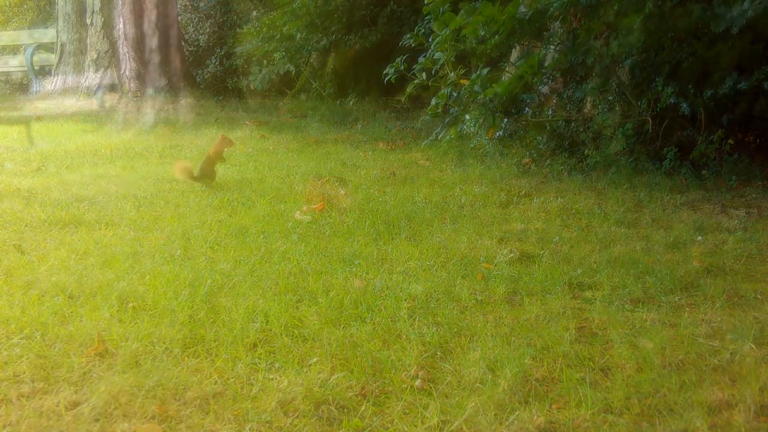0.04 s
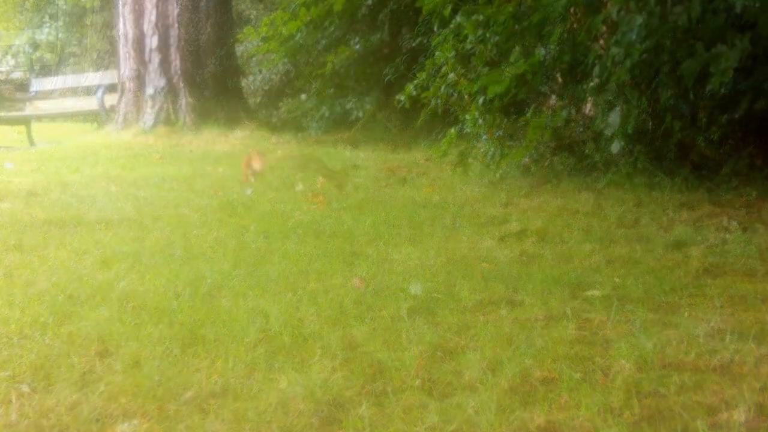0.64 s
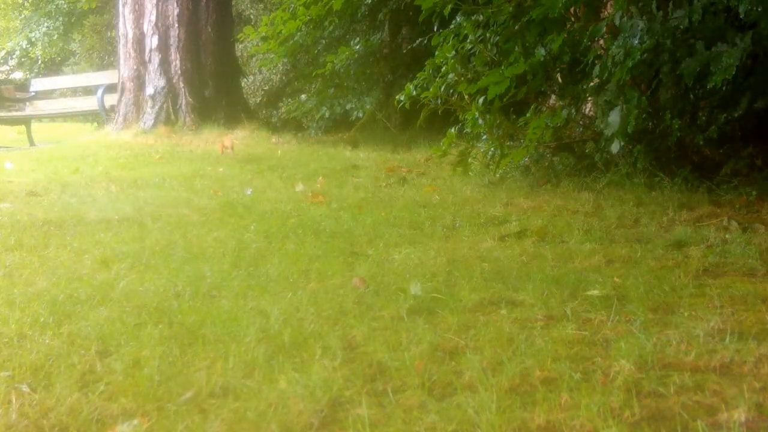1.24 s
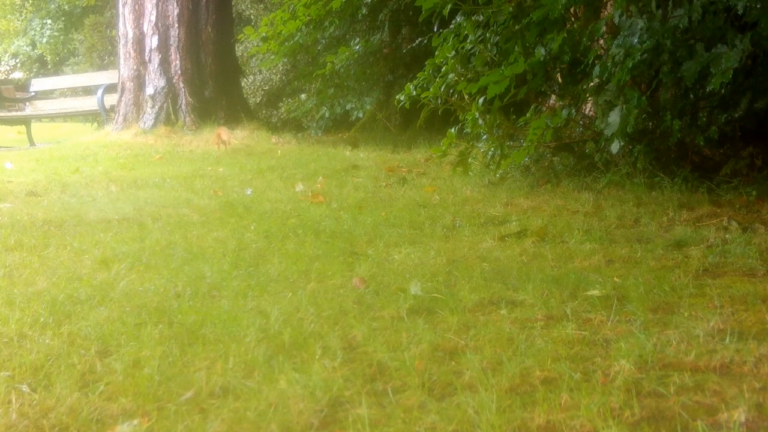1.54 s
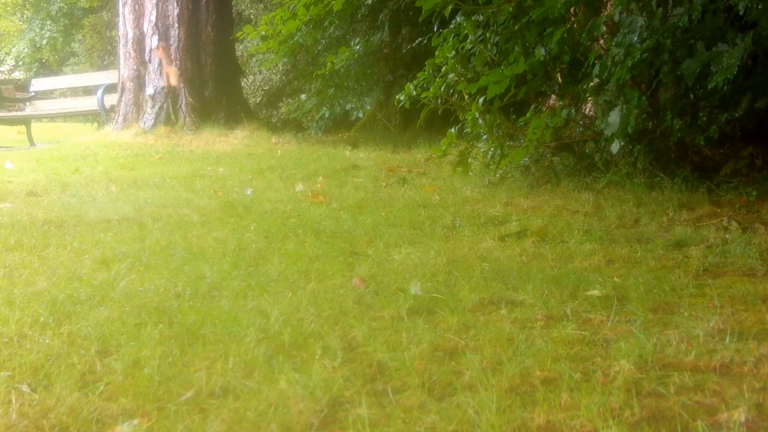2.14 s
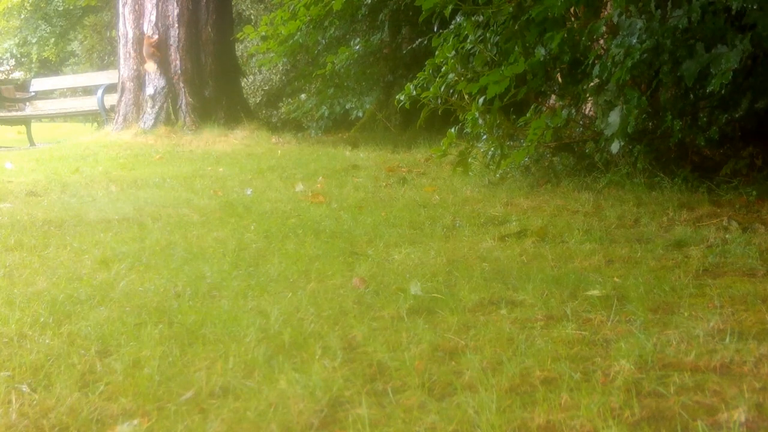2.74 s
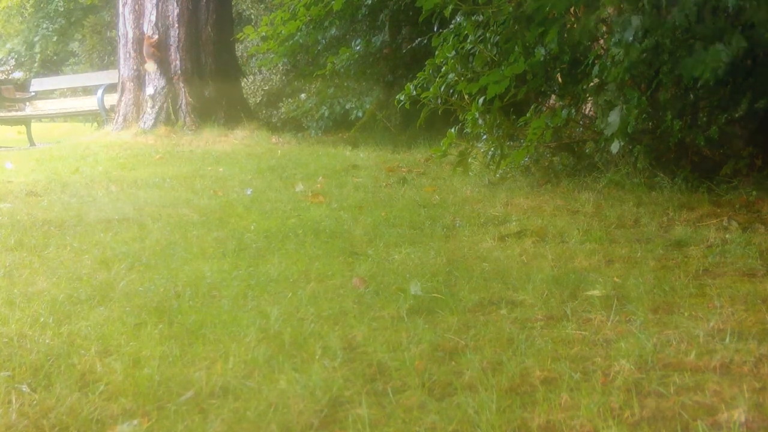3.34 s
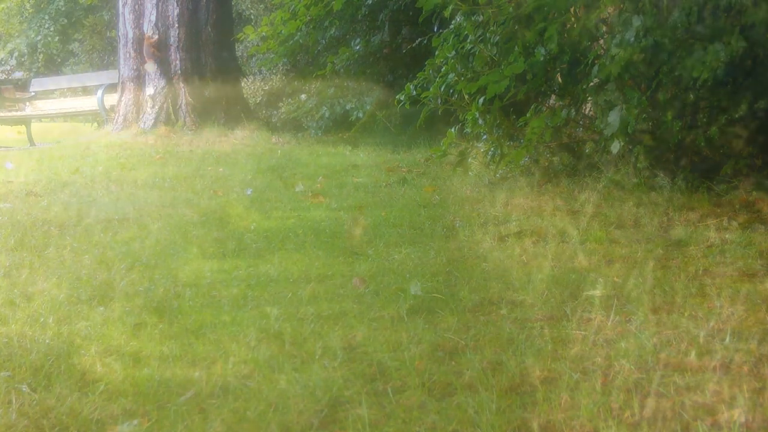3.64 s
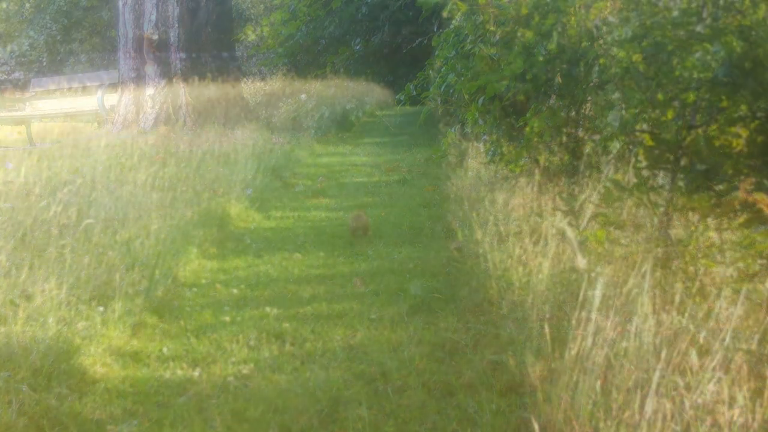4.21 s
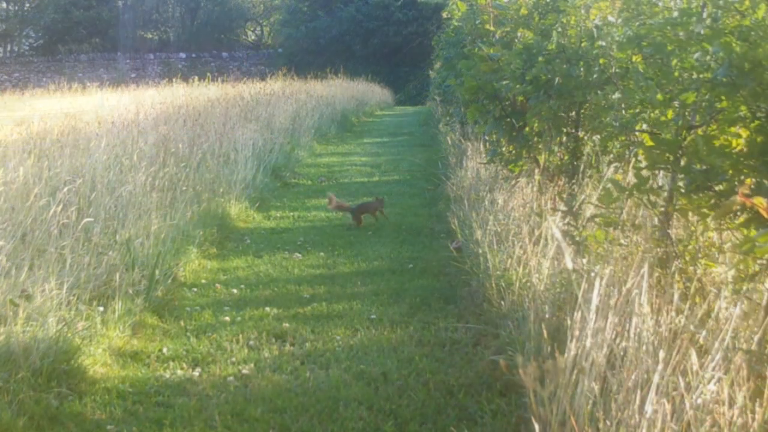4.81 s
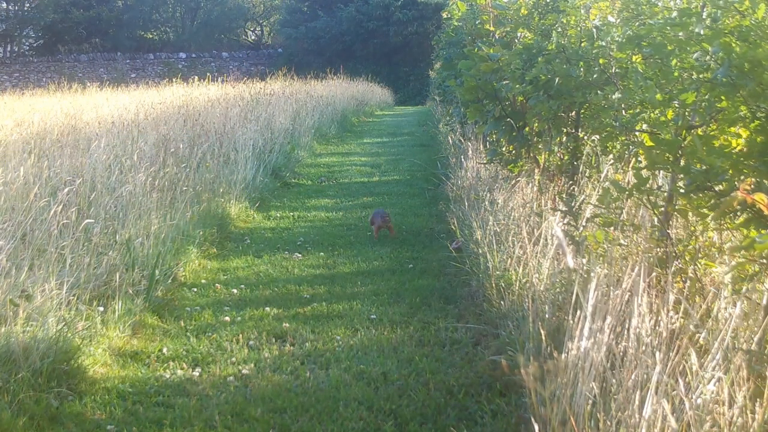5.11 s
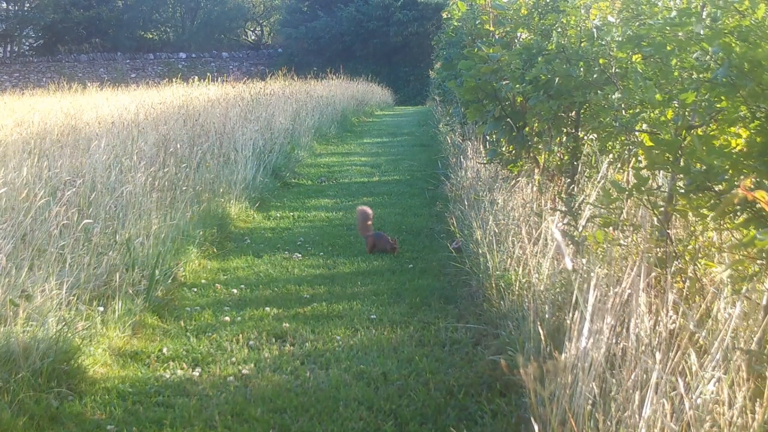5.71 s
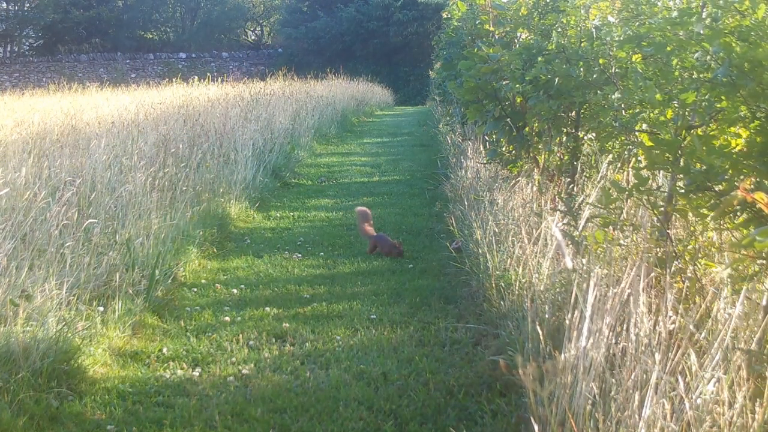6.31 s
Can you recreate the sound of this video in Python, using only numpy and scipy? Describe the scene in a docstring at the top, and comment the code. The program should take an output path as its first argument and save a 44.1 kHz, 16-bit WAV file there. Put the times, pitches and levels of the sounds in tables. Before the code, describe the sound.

Outdoors, a smooth, gentle rush of wind in leaves carries on, touched by a few light, dry ticks. One loud, very short click overloads the microphone as the wind drops to a lighter, softer breeze over a meadow. Barely audible distant birds then give short rising chirps, while the microphone adds a faint hiss and a thin electrical whine.

```python
"""Garden wind, far birds

A soft, steady wind passes from open grass into the trees round a lawn, then dissolves into the quieter
air of a meadow path. A few faint, dry ticks sound, and small birds twitter and whistle far off.
The camera adds amplifier hiss, a thin electrical whine and one sharp click that overloads its input."""
import sys
import numpy as np
from scipy import signal
from scipy.fft import rfft, irfft
from scipy.io import wavfile

SR = 44100
rng = np.random.default_rng(int(sys.argv[2]) if len(sys.argv) > 2 else 0)


def dump_mix(stems):
    """Bounce the given channels to the path in sys.argv[1] as a 16-bit WAV at rate SR."""
    frames = np.atleast_2d(stems).T  # one column per channel
    limited = np.clip(frames, -1, 1)  # hard clip at full scale
    pcm = np.round(limited * 32767).astype(np.int16)
    wavfile.write(sys.argv[1], SR, pcm)


N = 280476
TIME = np.arange(N) / SR

# tone of the wind in the lawn's trees: (frequency [Hz], relative level [dB])
TREE_WIND_COLOUR = [(20, -27), (60, -17.5), (150, -10.5), (400, -1.5), (700, 0), (1250, -1), (2450, -7.5),
                    (3300, -16), (4000, -22), (5500, -35.5), (7500, -51), (12000, -58)]
# lighter, brighter wind over open grass and meadow: (frequency [Hz], relative level [dB])
OPEN_WIND_COLOUR = [(20, -19), (100, -10), (250, -3.5), (700, 0.5), (1500, -2.5), (2300, -6), (3200, -12),
                    (4200, -15.5), (5300, -30.5), (7000, -45), (12000, -61)]
# blurred phrases of the farthest birds: (middle time [s], length [s], centre pitch [Hz], level [dB])
TWITTER_PHRASES = [(0.06, 0.3, 4700, -78.5), (0.28, 0.32, 4160, -79), (4.97, 0.55, 4120, -80),
                   (5.7, 0.45, 4340, -79), (6.11, 0.08, 5050, -81), (6.19, .06, 2930, -69.5),
                   (6.205, .025, 3550, -68), (6.2, 0.18, 3980, -73)]
# light, dry contacts: (time [s], level before filtering [dB], pitch [Hz])
DRY_TICKS = [(.6529, -34, 2390), (.6538, -36.5, 2400), (.656, -29.5, 2000), (2.0932, -39, 1500),
             (2.9766, -33, 1600), (3.2505, -32, 1600)]
# far birds, high chirps and one low hoot:
# (time [s], length [s], start pitch [Hz], end pitch [Hz], level [dB], rasp [share of pitch])
BIRD_CALLS = [(4.793, .03, 3420, 4000, -76, .02), (4.88, 0.033, 3600, 4000, -74.5, .016),
              (4.928, .02, 3800, 4000, -70, .035), (5.052, .056, 3520, 4370, -71.3, .014),
              (5.197, .088, 3320, 4550, -70.8, .014), (5.345, .055, 575, 557, -65.5, 0.024),
              (5.345, 0.072, 815, 830, -65.5, .02), (5.603, .02, 4500, 4850, -75, .04),
              (5.742, .025, 4950, 5200, -81, .02), (6.137, .018, 4100, 3940, -73, .05),
              (6.186, 0.021, 3880, 4100, -59, 0.025)]
# reflections off hedge and trees: (delay [s], level [dB])
HEDGE_ECHOES = [(.011, -17), (.031, -24), (.054, -18)]

TO_LAWN_S, TO_MEADOW_S, DISSOLVE_S = 0.087, 4.095, 2.02   # middles and length of the crossfades
LAWN_ENTERS_S, LAWN_ATTACK_S = 0.196, 0.023   # the rush of the trees cuts in abruptly
WHINE_HZ, CYCLES_PER_FIELD, FIELD_START_S = 7796.3, 131, 5.4224
FAINT_WHINE_DB, STRONG_WHINE_DB = -92.5, -79
CLICK_S = 4.136293


def from_db(db):
    """Decibels to gain."""
    return 10 ** (np.asarray(db) / 20)


def unit_rms(x):
    """Scale to an rms of 1."""
    return x / np.sqrt(np.mean(x ** 2) + 1e-20)


def one_pole(x, hz, kind):
    """A gentle low-pass or high-pass."""
    return signal.sosfilt(signal.butter(1, hz, kind, fs=SR, output="sos"), x)


def ramp(middle_s, length_s):
    """A straight fade from 0 to 1."""
    return np.clip(.5 + (TIME - middle_s) / length_s, 0, 1)


def drift(rate_hz):
    """A smooth random wander, mostly slower than `rate_hz`; rms 1."""
    hz = np.arange(N // 2 + 1) * SR / N
    return unit_rms(irfft(rfft(rng.standard_normal(N)) / (1 + (hz / rate_hz) ** 2), N))


def coloured_noise(colour):
    """Noise shaped by an EQ curve; rms 1."""
    hz = np.maximum(np.arange(N // 2 + 1) * SR / N, 1)
    points_hz, points_db = np.transpose(colour)
    gain = from_db(np.interp(np.log(hz), np.log(points_hz), points_db))
    return unit_rms(irfft(rfft(rng.standard_normal(N)) * gain, N))


def place_faders():
    """How much of the open grass, the lawn and the meadow is heard at each moment."""
    to_lawn, to_meadow = ramp(TO_LAWN_S, DISSOLVE_S), ramp(TO_MEADOW_S, DISSOLVE_S)
    at_lawn = to_lawn * (1 - to_meadow) * ramp(LAWN_ENTERS_S, LAWN_ATTACK_S)
    return 1 - to_lawn, at_lawn, to_meadow


def wind(colour, level_db, eddy_db, flutter_db, split_hz):
    """Countless far leaves merge into a smooth rush; eddies sway its lows, leaf flutter its highs."""
    rush = coloured_noise(colour)
    lows = one_pole(rush, split_hz, "low")
    sway = from_db(eddy_db * drift(4.1))
    flutter = from_db(flutter_db * drift(13))
    return from_db(level_db) * (lows * sway + (rush - lows) * flutter)


def amplifier_hiss(level_db):
    """The camera's amplifier lays a thin bed of white noise."""
    return from_db(level_db) * rng.standard_normal(N)


def circuit_whine(faint_fader, strong_fader, lopsided, octave_db, buzz_db):
    """The picture circuits whine, flipping sign every field: faint at first, jumping up at the click."""
    faint_gain = from_db(FAINT_WHINE_DB) * faint_fader
    strong_gain = from_db(STRONG_WHINE_DB) * strong_fader ** 1.5 * (TIME > CLICK_S)   # swells late
    phase = 2 * np.pi * WHINE_HZ * (TIME - FIELD_START_S)
    polarity = np.clip(2 * CYCLES_PER_FIELD * np.sin(phase / (2 * CYCLES_PER_FIELD)), -1, 1)
    # the faint whine wavers; the strong one is steady but lopsided, so it also carries its octave
    wavering = polarity * np.sin(phase + .35 * drift(25))
    octave = lopsided * from_db(octave_db) * np.sin(2 * phase)
    steady = (polarity + lopsided) * np.sin(phase) + octave
    whine = np.sqrt(2) * (faint_gain * wavering + strong_gain * steady)
    # every flip leaves a tiny spike: a fine buzz
    buzz = signal.sosfiltfilt(signal.butter(4, 6800, fs=SR, output="sos"), np.gradient(polarity))
    return whine + (faint_gain + strong_gain) * from_db(buzz_db) * buzz


def far_twitter(width_share):
    """Scattering among the trees smears distant song into narrow bands of noise that swell and fade."""
    out = np.zeros(N)
    for middle_s, length_s, hz, level_db in TWITTER_PHRASES:
        phase, width_hz = 2 * np.pi * hz * TIME, width_share * hz
        band = drift(width_hz) * np.sin(phase) + drift(width_hz) * np.cos(phase)
        swell = np.sin(np.pi * ramp(middle_s, length_s))
        out += from_db(level_db) * swell * band
    return out


def ticks(t60_s, band_hz):
    """Each tick is a light contact that rings for only a few cycles."""
    out = np.zeros(N)
    for start_s, level_db, hz in DRY_TICKS:
        age = np.clip(TIME - start_s, 0, 10 * t60_s)
        out += from_db(level_db - 60 * age / t60_s) * np.sin(2 * np.pi * hz * age)
    return signal.sosfilt(signal.butter(6, band_hz, "band", fs=SR, output="sos"), out)


def electrical_click(drive_db, up_s, down_s, smooth_hz, coupling_hz):
    """A voltage jumps up, then down for longer; the amplifier rounds it, its coupling adds a low thump."""
    up, down, back = (ramp(CLICK_S + delay, 1 / SR) for delay in (0, up_s, up_s + down_s))
    rounded = one_pole(up - 2 * down + back, smooth_hz, "low")
    return from_db(drive_db) * one_pole(rounded, coupling_hz, "high")


def bird_calls(waver_hz):
    """Short gliding whistles, rasped by a fast waver in pitch; hedge and trees throw them back."""
    calls, waver = np.zeros(N), drift(waver_hz)
    for start_s, length_s, start_hz, end_hz, level_db, rasp in BIRD_CALLS:
        progress = np.clip((TIME - start_s) / length_s, 0, 1)
        glide_hz = start_hz + (end_hz - start_hz) * progress ** 1.35   # starts slowly, then quickens
        phase = 2 * np.pi * np.cumsum(glide_hz * (1 + rasp * waver)) / SR
        envelope = np.sqrt(2 * np.abs(np.sin(np.pi * progress)))
        calls += from_db(level_db) * envelope * np.sin(phase)
    echoes = sum(from_db(db) * np.interp(TIME - delay, TIME, calls, left=0) for delay, db in HEDGE_ECHOES)
    return calls + echoes


def scene():
    """Three crossfaded wind beds, birds and ticks, with the camera's own noises on top; mono."""
    at_grass, at_lawn, at_meadow = place_faders()
    mix = at_grass * wind(OPEN_WIND_COLOUR, level_db=-52.5, eddy_db=2.5, flutter_db=-.9, split_hz=360)
    mix += at_lawn * wind(TREE_WIND_COLOUR, level_db=-51, eddy_db=.5, flutter_db=.33, split_hz=590)
    mix += at_meadow * wind(OPEN_WIND_COLOUR, level_db=-58, eddy_db=.5, flutter_db=.3, split_hz=370)
    before_meadow = np.hypot(at_grass, at_lawn)
    mix += np.hypot(before_meadow, at_meadow) * amplifier_hiss(level_db=-87)
    mix += circuit_whine(before_meadow, at_meadow, lopsided=.25, octave_db=-6, buzz_db=19)
    mix += far_twitter(width_share=.07)
    mix += ticks(t60_s=.0031, band_hz=(750, 3000))
    mix += electrical_click(drive_db=-1.9, up_s=.000163, down_s=.000243, smooth_hz=980, coupling_hz=19)
    mix += bird_calls(waver_hz=300)
    return mix[None]


def record(dry):
    """The input clips the click flat, and a steep low-pass trims the very top."""
    clipped = np.clip(dry, -.352, .352)
    return signal.sosfilt(signal.ellip(10, .1, 70, 16600, fs=SR, output="sos"), clipped)


dry = scene()
out = record(dry)
dump_mix(out)
```